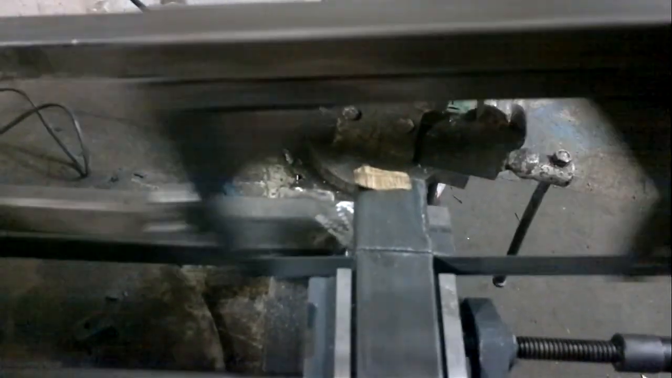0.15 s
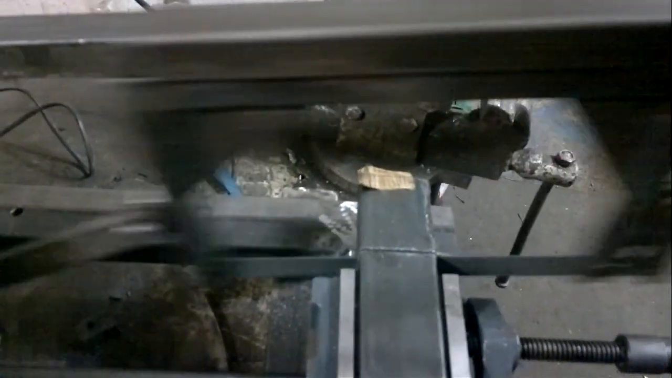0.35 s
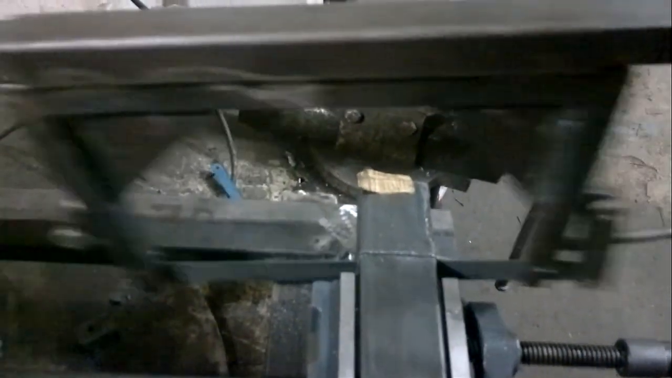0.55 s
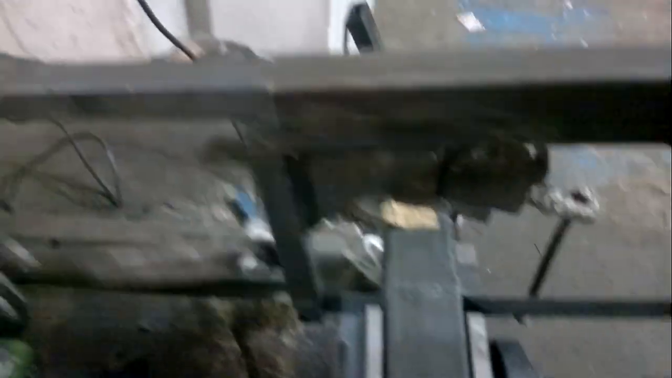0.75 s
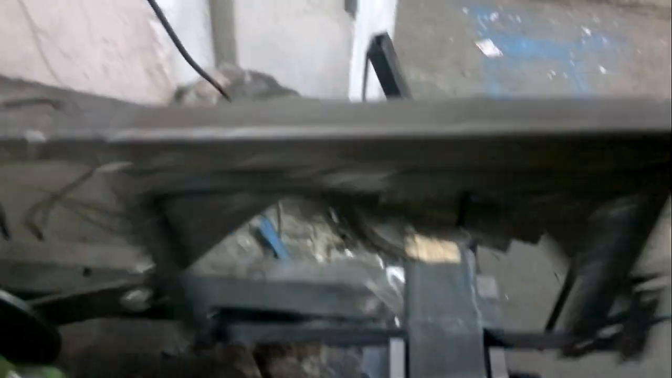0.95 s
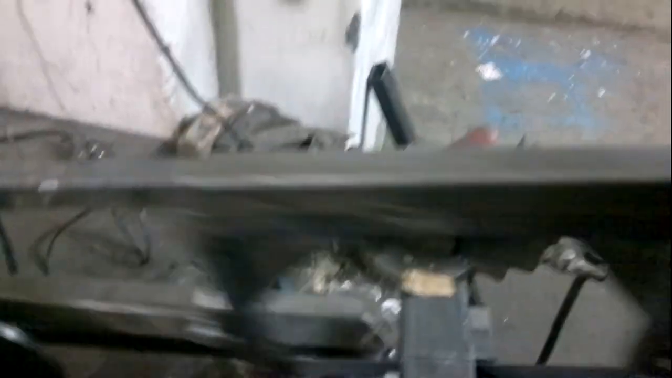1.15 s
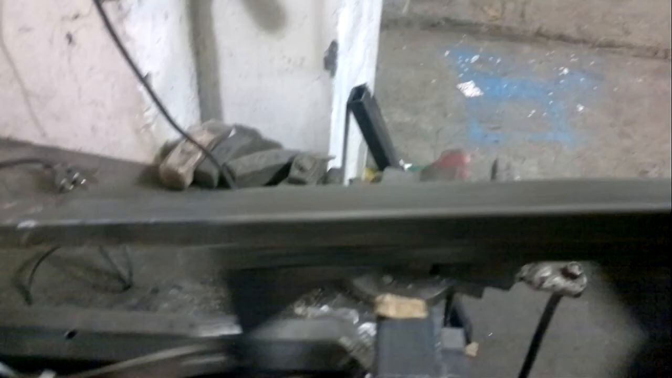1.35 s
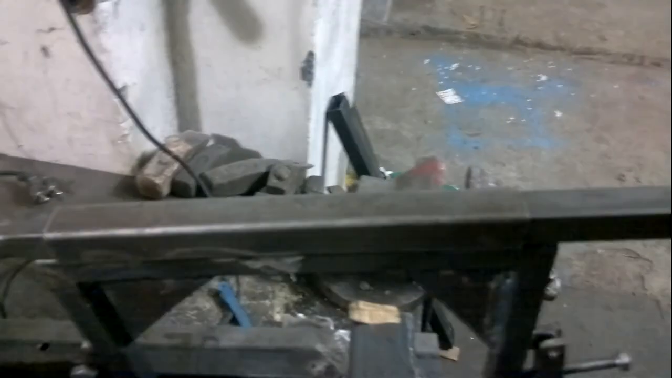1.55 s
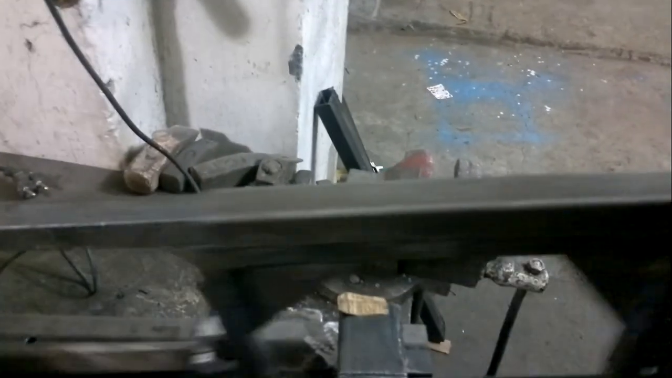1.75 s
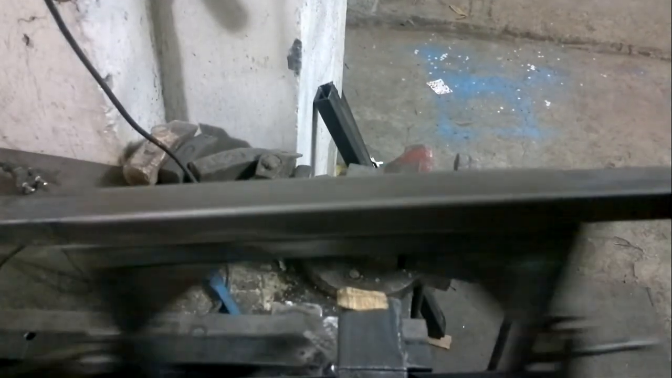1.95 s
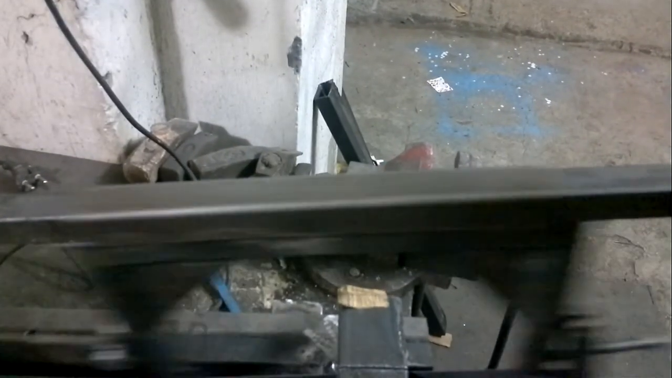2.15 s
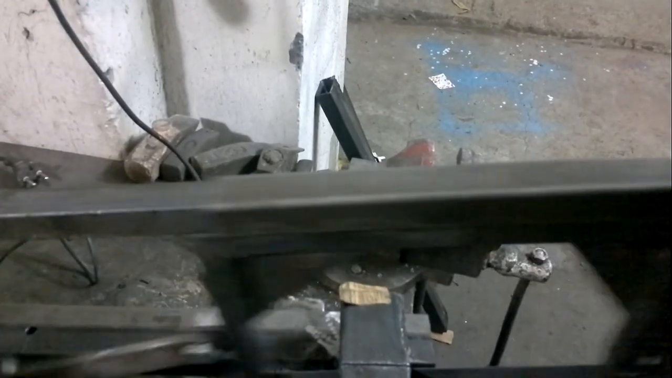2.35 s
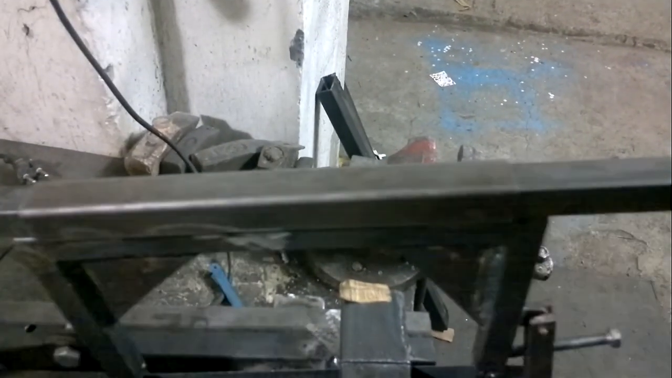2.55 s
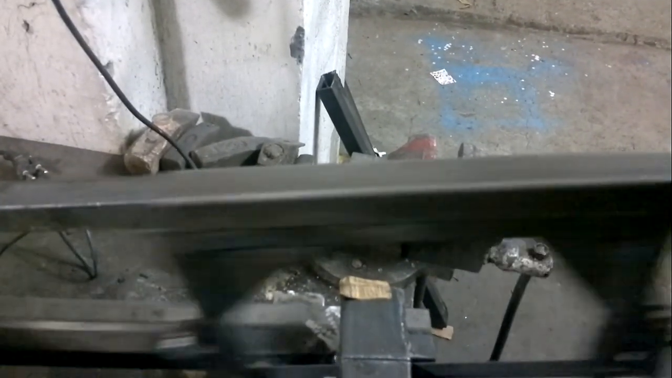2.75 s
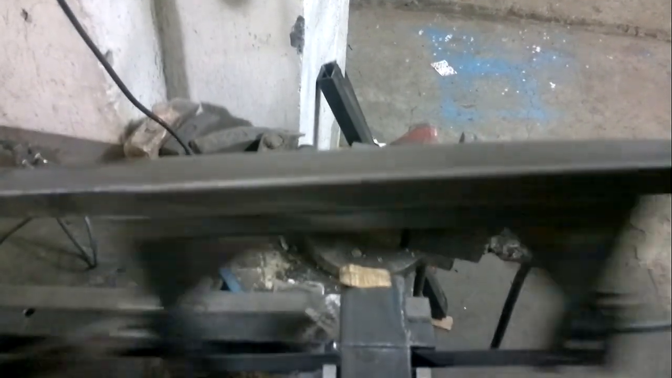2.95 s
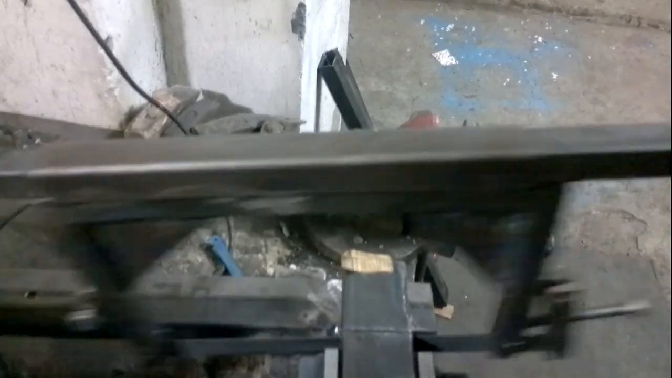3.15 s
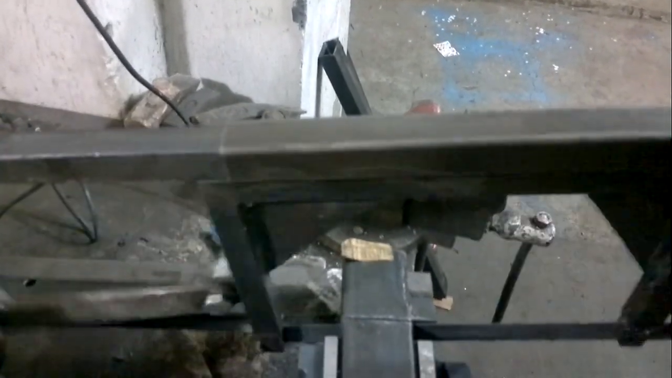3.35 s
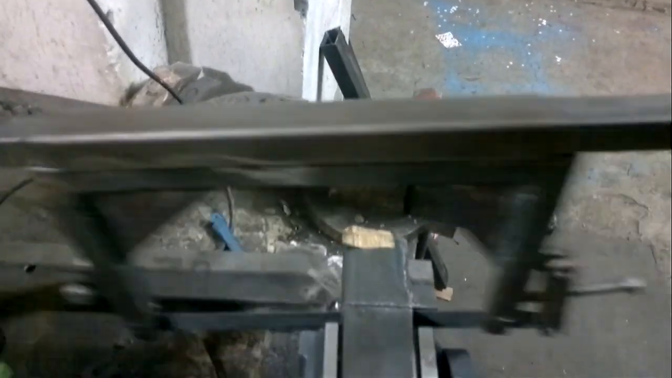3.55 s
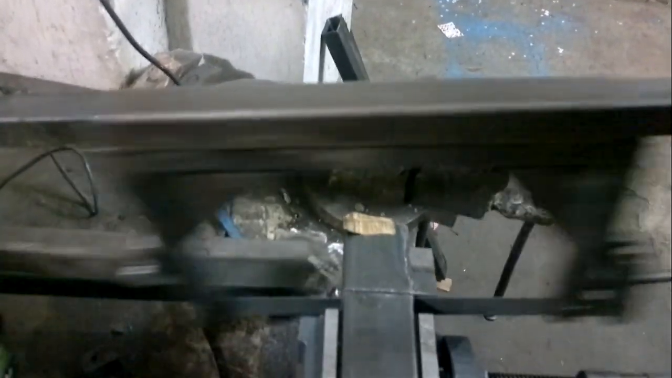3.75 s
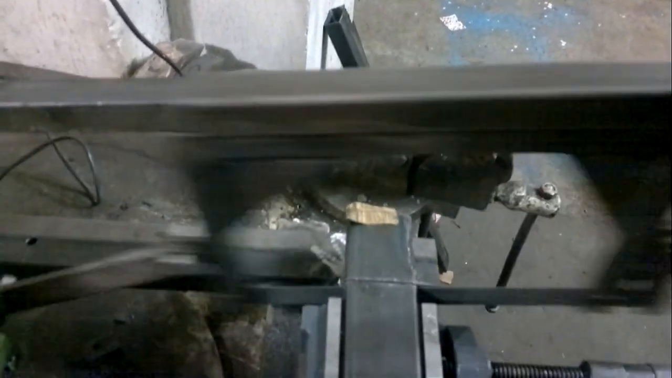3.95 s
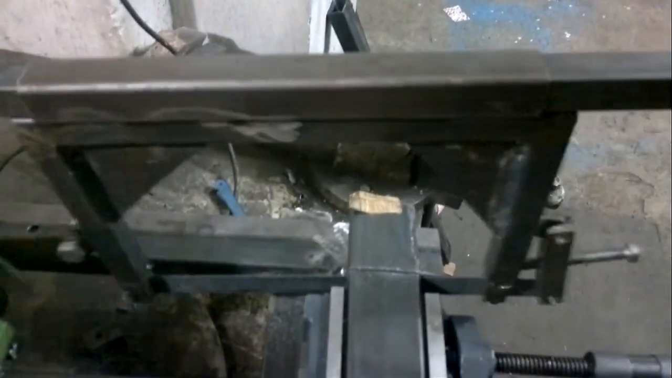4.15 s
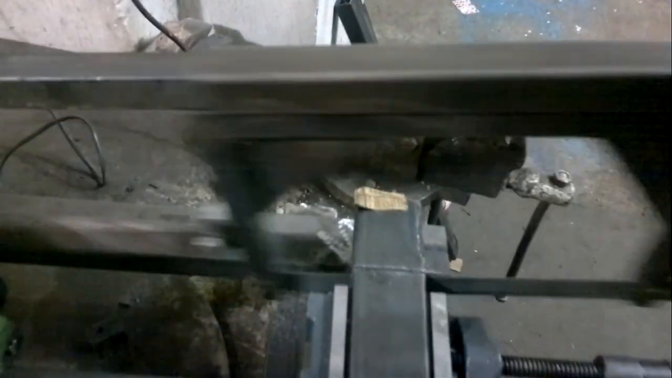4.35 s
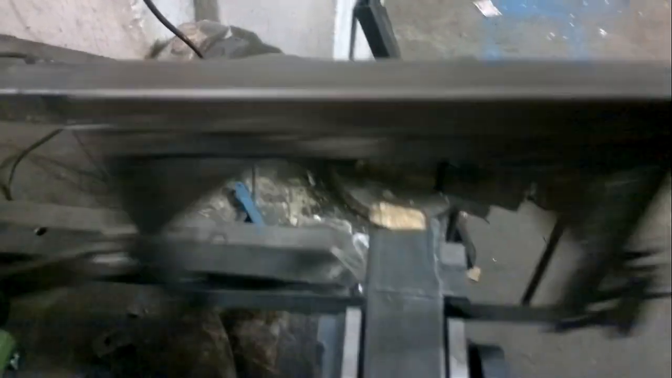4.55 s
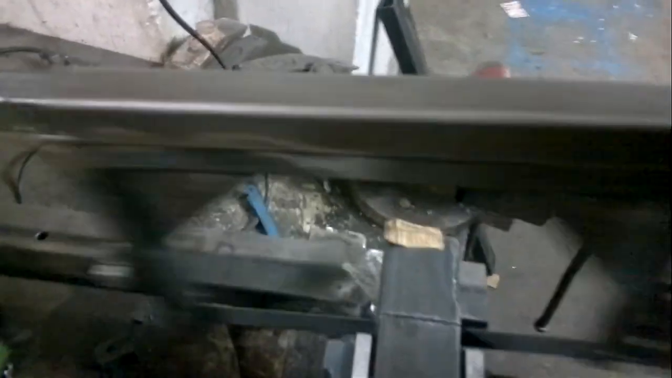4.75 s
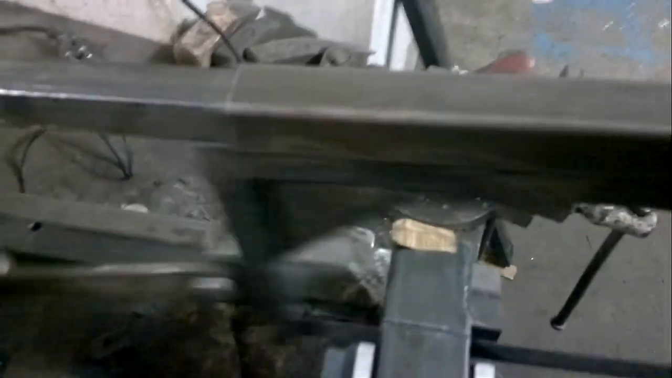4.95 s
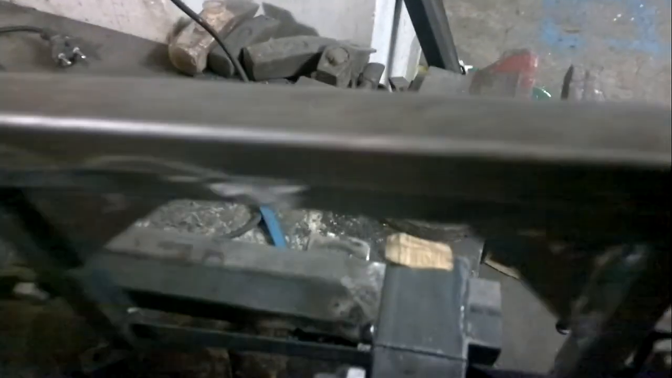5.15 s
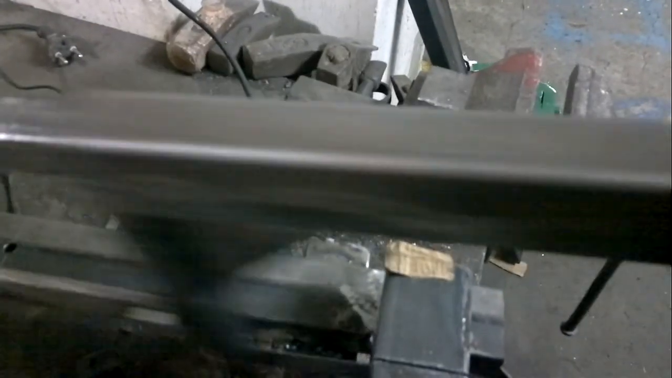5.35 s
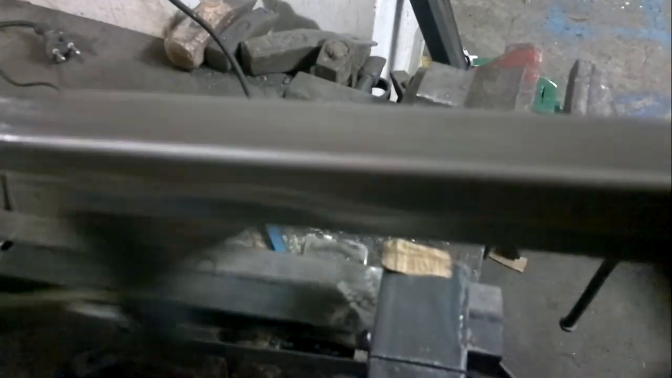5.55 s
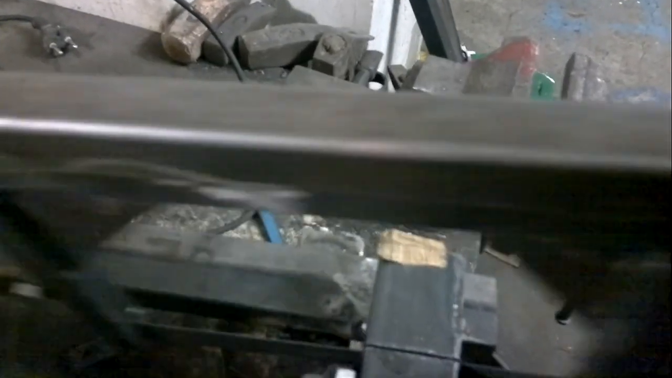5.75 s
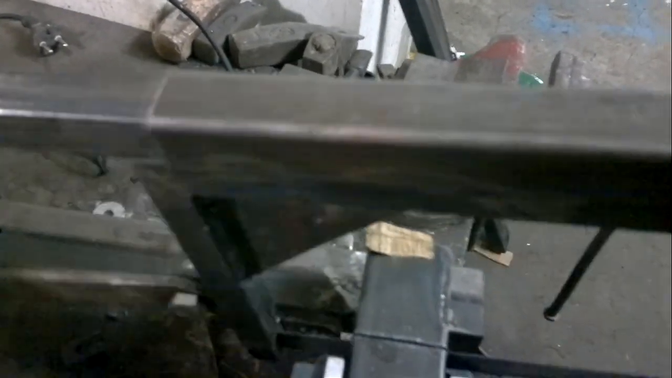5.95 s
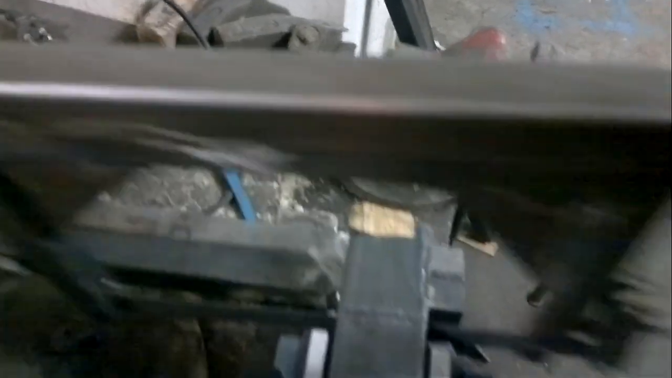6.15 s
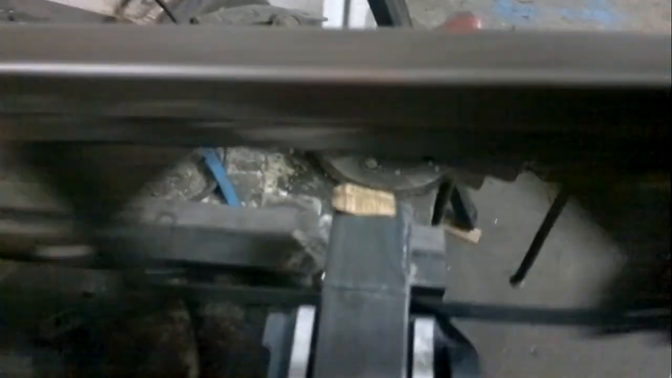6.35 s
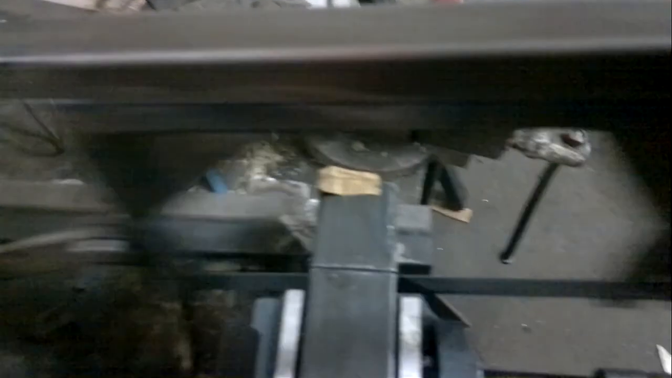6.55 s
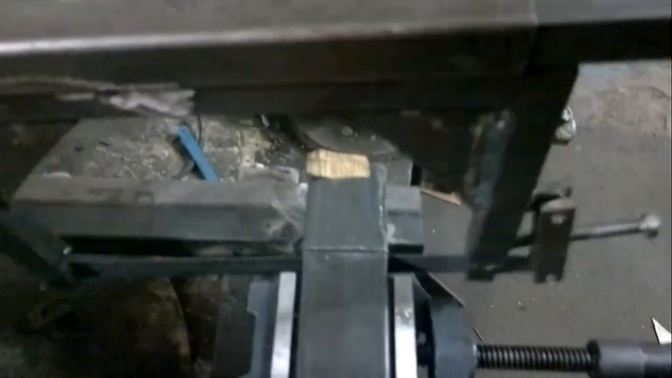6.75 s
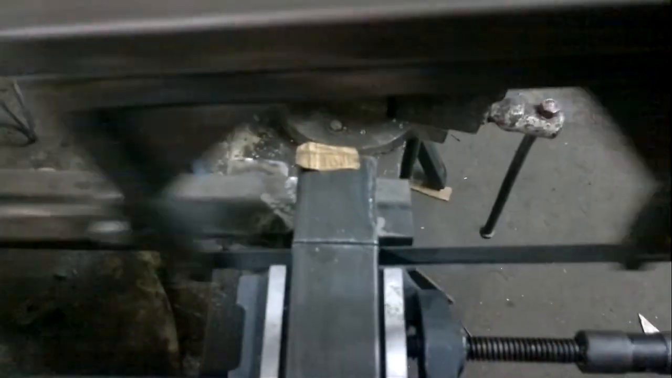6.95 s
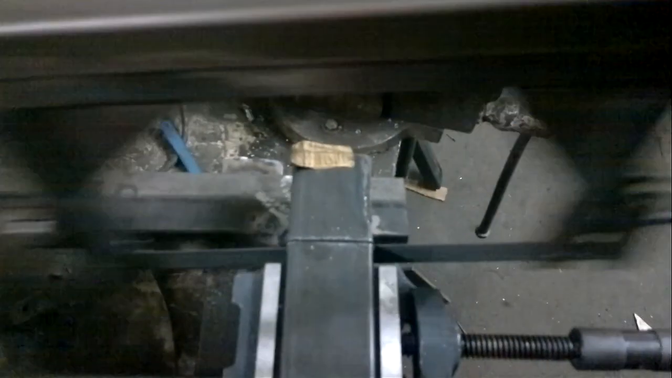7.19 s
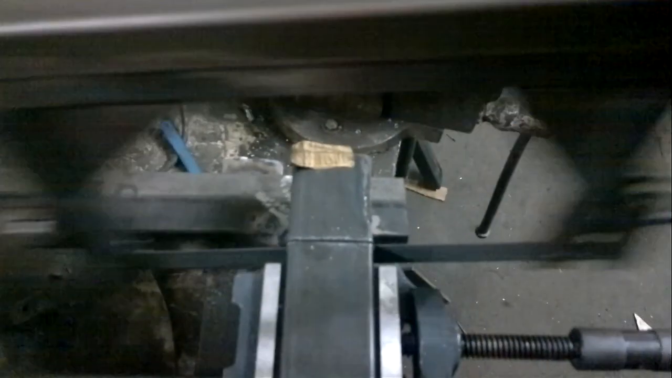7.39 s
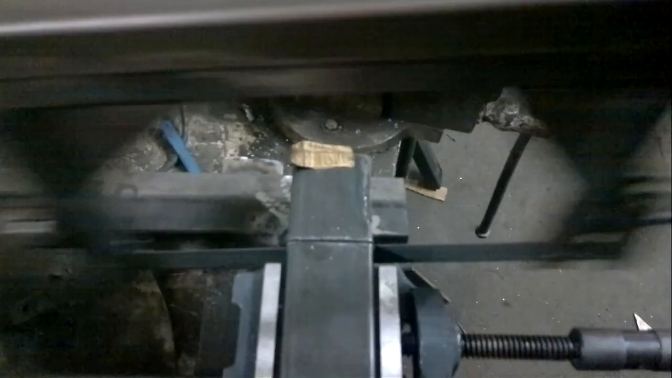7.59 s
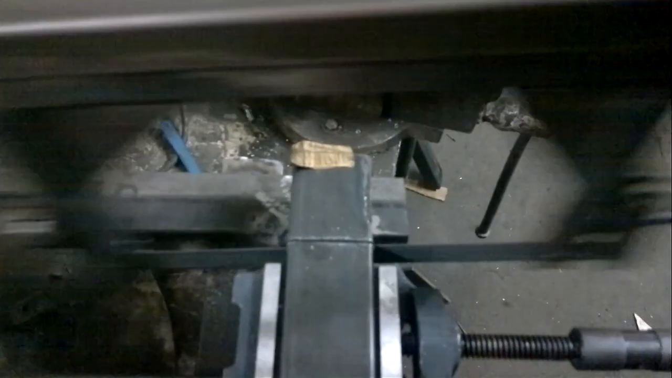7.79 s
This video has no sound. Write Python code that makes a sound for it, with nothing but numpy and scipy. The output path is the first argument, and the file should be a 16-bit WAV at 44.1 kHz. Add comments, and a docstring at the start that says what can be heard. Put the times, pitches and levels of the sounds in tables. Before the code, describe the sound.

Close in a small workshop, a motor-driven saw cuts metal with quick, even rasping strokes, sharp knocks and a steady hum and rumble.

```python
"""A homemade power hacksaw works through a square steel tube, close by in a small workshop.
A motor hums and the stand rumbles throughout, as a crank drives the blade to and fro about twice a second.
First the linkage knocks and the blade drags back, the slide groaning, a tooth sometimes snagging.
After another knock the teeth bite, chatter and rasp, the blade rings, the stand thuds and the stroke
glides out. Fourteen such cycles run, then the sound stops dead."""
import sys
import numpy as np
from scipy import signal
from scipy.fft import rfft, irfft
from scipy.io import wavfile
from scipy.ndimage import uniform_filter1d

SR = 44100
rng = np.random.default_rng(int(sys.argv[2]) if len(sys.argv) > 2 else 0)


def pcm_store(signal):
    """Save signal as 16-bit PCM."""
    levels = np.round(np.clip(np.atleast_2d(signal), -1, 1) * 32767)
    wavfile.write(sys.argv[1], SR, levels.astype(np.int16).T)


N = 344808
TIME = np.arange(N) / SR
TAPS = 16384


def undb(db):
    """Decibels to gain."""
    return 10 ** (np.asarray(db) / 20)


def unit(x):
    """Scale to rms 1."""
    return x / np.sqrt(np.mean(x ** 2))


def wobble(rate_hz):
    """Random steps, smoothed twice; rms 1."""
    hold = max(int(SR / rate_hz), 1)
    steps = np.repeat(rng.standard_normal(N // hold + 1), hold)
    return unit(uniform_filter1d(uniform_filter1d(steps, hold), hold)[:N])


def through(x, response):
    """Convolve each channel with an impulse response."""
    x = np.atleast_2d(x)
    return signal.fftconvolve(x, np.atleast_2d(response), axes=1)[:, :x.shape[1]]


def colour(spectrum, modes=()):
    """Minimum-phase response: a (freq_hz, level_db) spectrum plus (pitch_hz, t60_s, level_db) modes."""
    freq_hz, level_db = np.transpose(spectrum)
    bins_hz = np.maximum(np.arange(TAPS // 2 + 1) * SR / TAPS, 1)
    power = unit(undb(np.interp(np.log(bins_hz), np.log(freq_hz), level_db))) ** 2
    for pitch_hz, t60_s, mode_db in modes:
        detune = (bins_hz - pitch_hz) * 2 * np.pi * t60_s / np.log(1000)
        peak = unit(1 / np.hypot(1, detune) / np.hypot(1, detune / 10))
        power = power + (undb(mode_db) * peak) ** 2
    cepstrum = irfft(np.log(power) / 2)
    cepstrum[1:TAPS // 2] *= 2
    cepstrum[TAPS // 2 + 1:] = 0
    return irfft(np.exp(rfft(cepstrum)))


def stereo_noise(envelope=1, alike_hz=1050):
    """Noise pair: long waves reach both sides alike, short ones unrelated."""
    left, other = rfft(envelope * rng.standard_normal((2, N)))
    freq_hz = np.arange(len(left)) * SR / N
    alike = 1 / (1 + (freq_hz / alike_hz) ** 4)
    right = alike * left + np.sqrt(1 - alike ** 2) * other
    return irfft(np.array([left, right]), N)


def resonant_noise(modes):
    """Noise in steep (pitch_hz, width_hz, level_db) resonances; rms 1."""
    total = 0
    for pitch_hz, width_hz, level_db in modes:
        b, a = signal.iirpeak(pitch_hz, pitch_hz / (2 * width_hz), fs=SR)
        band = signal.lfilter(b, a, rng.standard_normal(N))
        total = total + undb(level_db) * unit(signal.lfilter(b, a, band))
    return unit(total)


def swell(start_s, level_db, rise_db, attack_s, hold_s, release_s, change_db=0):
    """Envelope: climbs rise_db to level_db, moves change_db over the hold, falls 20 dB per release_s."""
    gain = np.zeros(N)
    span = slice(*np.searchsorted(TIME, [start_s, start_s + attack_s + hold_s + 3 * release_s]))
    held_s = TIME[span] - start_s - attack_s
    attack_db = rise_db * np.minimum(held_s / attack_s, 0)
    hold_db = change_db * np.clip(held_s / hold_s, 0, 1)
    release_db = 20 * np.maximum(held_s - hold_s, 0) / release_s
    gain[span] = undb(level_db + attack_db + hold_db - release_db)
    return gain


def bursts(times_s, sizes, fall_s):
    """Envelope: jumps at each blow, decays exponentially."""
    blows = np.zeros(N)
    np.add.at(blows, np.clip((np.asarray(times_s) * SR).astype(int), 0, N - 1), sizes)
    return signal.lfilter([1], [1, -np.exp(-1 / (fall_s * SR))], blows)


def linger(power, t60_s):
    """Stored energy leaks away, 60 dB in t60_s."""
    keep = np.exp(-2 * np.log(1000) / (t60_s * SR))
    return signal.lfilter([1 - keep], [1, -keep], power)


def crank():
    """Crank angle in half turns: a whole number at each reversal of the blade."""
    reversals_s = np.sort([row[0] for row in CUTS + RETURNS])
    end_s = 2 * reversals_s[-1] - reversals_s[-2]
    return np.interp(TIME, np.append(reversals_s, end_s), np.arange(len(reversals_s) + 1))


def blade_speed():
    """0 at the reversals, 1 at mid-stroke."""
    return np.abs(np.sin(np.pi * crank()))


def teeth(grit_db, depth, mid_stroke_hz=480, grain_samples=6):
    """Tiny uneven fractures, bunched once per passing tooth; the rate follows blade speed."""
    rate_hz = mid_stroke_hz * blade_speed() * (1 + 0.1 * wobble(150))
    tooth_phase = np.cumsum(rate_hz) / SR % 1
    fractures = undb(grit_db * np.minimum(rng.exponential(size=N // grain_samples + 1), 5))
    return unit(np.repeat(fractures, grain_samples)[:N] * np.exp(-depth * tooth_phase))


# modes of tube and blade: pitch_hz, t60_s, catch_db, cut_db, rub_db
STEEL_MODES = [(615, 0.12, -24.5, -33.5, -32), (973, 0.017, -19, -20, -24.5), (2104, 0.031, -7, -2, -5.5),
               (2560, .09, -26.5, -33.5, -20), (3053, .06, -3, -9, -19.5), (3780, .026, -9.5, -17, -17.5),
               (4095, 0.02, -9, -23.5, -30), (5057, 0.06, -15, -14.5, -25), (6000, 0.024, -21, -24, -21.5),
               (10250, 0.011, -37, -22.5, -34.5)]


def radiate(force, spectrum, contact, frame_t60_s, room_db, modes_db=0, room_t60_s=0.35):
    """A force rings in the frame's dense modes, the steel's few strong ones and the workshop."""
    energy = linger(force ** 2, frame_t60_s) + undb(room_db) ** 2 * linger(force ** 2, room_t60_s)
    pitch_hz, t60_s, catch_db, cut_db, rub_db = np.transpose(STEEL_MODES)
    level_db = {"catch": catch_db, "cut": cut_db, "rub": rub_db}[contact] + modes_db
    return through(stereo_noise(np.sqrt(energy)), colour(spectrum, zip(pitch_hz, t60_s, level_db)))


# rumble as the microphones move about the machine: time_s, hum_db, frame_db
RUMBLE_LEVELS = [(0.0, -31, -40.5), (0.15, -34, -40.5), (1.05, -31, -35), (1.6, -38.0, -44),
                 (2.0, -34.5, -37), (2.6, -40, -41.5), (3.05, -30, -37.5), (3.6, -32.5, -38),
                 (4.15, -30.5, -33.5), (4.6, -36, -41.5), (5.3, -35.5, -38), (5.9, -39.5, -39.5),
                 (6.6, -39.0, -37.5), (7.25, -35.5, -40.5)]
# drive whirr: freq_hz, level_db
WHIRR_SPECTRUM = [(100, -12), (350, 2), (600, -5), (900, -3.5), (1400, -9.5), (2100, 0), (4000, -2.5),
                  (6000, -19.5), (15000, -41)]


def drive(hum_hz=120.5):
    """The motor hums at twice the mains rate and shakes stand and panels; whirr grows with blade speed."""
    time_s, hum_db, frame_db = np.transpose(RUMBLE_LEVELS)
    cycles = np.cumsum(hum_hz * (1 + 0.01993 * wobble(14))) / SR
    motor = unit(np.sin(2 * np.pi * cycles) + undb(-3.5) * resonant_noise([(134.5, 10.3, 0)]))
    hum = undb(np.interp(TIME, time_s, hum_db) + 2.4 * wobble(14)) * motor
    sway = undb(-0.5 + 2 * wobble(11)) * resonant_noise(STAND_MODES)
    rattle = undb(-1) * resonant_noise(PANEL_MODES)
    frame = undb(np.interp(TIME, time_s, frame_db)) * (sway + rattle)
    whirr = unit(through(stereo_noise(), colour(WHIRR_SPECTRUM)))
    whirr_db = -39.54 + 2.02 * blade_speed() + 1.8 * wobble(25)
    return hum + frame + undb(whirr_db) * whirr


# resonances of the stand and its panels: pitch_hz, width_hz, level_db
STAND_MODES = [(46, 7.6, -8), (60, 7.6, -0.5), (77.6, 8.4, 0), (101, 4.3, 0)]
PANEL_MODES = [(171, 11, 0), (208, 11, 0), (238, 18, -3), (280, 40, -3), (326, 10, -2), (365, 50, -6)]


def stand_jolts(delay_s=0.039):
    """Each bite rattles the panels and, a moment later, rocks the stand in its low modes."""
    start_s, *_, thud_db, rattle_db = np.transpose(CUTS)
    t = TIME[:TAPS]
    rocking = sum(undb(db) * np.exp(-np.pi * width_hz * t) * np.sin(2 * np.pi * hz * t)
                  for hz, width_hz, db in STAND_MODES)
    push = bursts(start_s + delay_s, undb(thud_db), fall_s=0.003)
    thuds = through(push, rocking)
    rattle = sum(swell(s, db, rise_db=10, attack_s=0.05, hold_s=0.043, release_s=0.25)
                 for s, db in zip(start_s, rattle_db))
    return thuds * push.max() / np.abs(thuds).max() + rattle * resonant_noise(PANEL_MODES)


def slide(groan_hz=773, squeak_hz=2150, squeak_s=0.99, late_s=0.088):
    """The bow's guide groans on one note as it moves, most late in the return; once it squeaks."""
    setting_off = sum(swell(s, db, rise_db=12, attack_s=0.021, hold_s=0.025, release_s=0.093)
                      for s, *_, db, _ in RETURNS)
    slowing = sum(swell(s + late_s, db, rise_db=17, attack_s=0.12, hold_s=0.004, release_s=0.061)
                  for s, *_, db in RETURNS)
    in_cut = sum(swell(s, -38, rise_db=19, attack_s=0.024, hold_s=0.18, release_s=0.073, change_db=-6)
                 for s, *_ in CUTS)
    squeak_gain = swell(squeak_s, -25.5, rise_db=20, attack_s=0.026, hold_s=0.026, release_s=0.043)
    squeak = squeak_gain * resonant_noise([(squeak_hz, 210, 0)])
    groan = (setting_off + slowing + in_cut) * resonant_noise([(groan_hz, 36, 0)])
    return groan + squeak


# linkage knock: freq_hz, level_db
KNOCK_SPECTRUM = [(200, -9), (1300, -6.5), (2200, -8), (3200, 5.5), (4400, 0), (5300, -12), (6500, -7),
                  (8500, -20), (13000, -28.5), (15500, -55)]


def linkage_knocks():
    """Slack in the linkage closes with a short bright knock at both ends of the travel."""
    return_s, knock_db, *_ = np.transpose(RETURNS)
    cut_s, *_ = np.transpose(CUTS)
    force = bursts(return_s, undb(knock_db), fall_s=0.0065) + bursts(cut_s, undb(-17.5), fall_s=0.0099)
    return radiate(force, KNOCK_SPECTRUM, "rub", frame_t60_s=0.039, room_db=-3.5, modes_db=-5)


# return strokes: start_s, knock_db, drag_db, early_groan_db, late_groan_db
RETURNS = [(0.051, -23, -20, -44.5, -30.5), (0.569, -19.5, -18.5, -45, -27),
           (1.092, -24, -18.5, -37.5, -31), (1.613, -29, -24, -49, -35), (2.131, -20, -19.5, -37.5, -35.5),
           (2.651, -22.5, -21, -40.5, -35.5), (3.172, -17.5, -19, -35.5, -33),
           (3.692, -17.5, -19, -32, -37), (4.212, -16, -16.5, -33, -33.5), (4.731, -20, -18, -45, -32),
           (5.252, -20, -20.5, -42, -34.5), (5.772, -21.5, -19.5, -46, -32.5),
           (6.293, -21, -20, -45, -32.5), (6.813, -21, -20.5, -42, -31)]
# blade dragging back: freq_hz, level_db
DRAG_SPECTRUM = [(200, -13.5), (550, -15), (1000, -11.5), (1400, -11), (2000, 2), (2500, 0), (4100, 2),
                 (5000, -10), (6400, -10), (8000, -17), (10500, -21.5), (13500, -31.5), (15500, -36.5)]


def blade_drag(speed_power=0.63):
    """The backs of the teeth swish over the tube, pressed hardest late in the return."""
    pressure = sum(swell(s, db, rise_db=10.5, attack_s=0.16, hold_s=0.026, release_s=0.15)
                   for s, _, db, *_ in RETURNS)
    load = pressure * blade_speed() ** speed_power
    force = load * undb(1.5 * wobble(110)) * teeth(grit_db=3.3, depth=1.6)
    return radiate(force, DRAG_SPECTRUM, "rub", frame_t60_s=0.025, room_db=-11, modes_db=-2)


# snagging teeth: start_s, level_db
SNAGS = [(0.703, -18), (1.78, -12.5), (2.787, -18.5), (2.821, -14.5), (2.855, -20), (3.847, -16),
         (5.417, -15.5), (6.488, -18), (6.951, -10)]


def tooth_snags():
    """A tooth hooks the edge of the cut on the way back and lets go with a ringing tick."""
    start_s, level_db = np.transpose(SNAGS)
    force = bursts(start_s, undb(level_db), fall_s=0.004)
    return radiate(force, DRAG_SPECTRUM, "catch", frame_t60_s=0.012, room_db=-8, modes_db=3)


# blade gliding out: freq_hz, level_db
GLIDE_SPECTRUM = [(150, -12.5), (300, -4.5), (550, -13), (1300, -10), (2050, -5), (2800, -4), (4000, -4),
                  (5000, -17), (6500, -16), (10000, -26.5), (13500, -35), (15500, -48)]


def blade_glide(speed_power=1.81):
    """The blade rubs through the forward stroke, ever more softly as it slows."""
    start_s, *_, glide_db, _, _ = np.transpose(CUTS)
    stroke = crank().astype(int)
    forward_strokes = np.rint(np.interp(start_s, TIME, crank())).astype(int)
    pressure = np.zeros(stroke[-1] + 1)
    pressure[forward_strokes] = undb(glide_db)
    load = pressure[stroke] * blade_speed() ** speed_power
    force = load * undb(0.45 * wobble(70)) * teeth(grit_db=3, depth=1)
    return radiate(force, GLIDE_SPECTRUM, "rub", frame_t60_s=0.032, room_db=-10.5, modes_db=1)


def blade_ring(pitch_hz=3780, width_hz=55):
    """Each bite sets one mode of the taut blade singing, faintly in the last strokes as the cut deepens."""
    gain = sum(swell(s, db, rise_db=16.5, attack_s=0.0074, hold_s=0.036, release_s=0.055)
               for s, _, _, _, db, *_ in CUTS)
    return gain * np.array([resonant_noise([(pitch_hz, width_hz, 0)]) for _ in range(2)])


def bow_chatter(rate_hz=108, catches=11):
    """Envelope of the bow's catches in each cut: regular at first, then looser and weaker."""
    start_s = np.array(CUTS)[:, :1]
    scatter = rng.standard_normal((len(CUTS), 2, catches))
    gaps_s = np.abs(1 + scatter[:, 0] * np.linspace(0.02, 0.36, catches)) / rate_hz
    catch_s = start_s + np.cumsum(gaps_s, axis=1) - gaps_s
    sizes = undb(scatter[:, 1]) * np.linspace(2.4, 0.7, catches)
    return bursts(catch_s.ravel(), sizes.ravel(), fall_s=0.0027)


# cutting strokes: start_s, bite_db, surge_db, length_s, ring_db, glide_db, thud_db, rattle_db
CUTS = [(0.312, -14.5, -14.5, 0.081, -15.5, -25.5, -23.5, -28.5),
        (0.832, -14.5, -17, 0.089, -20, -25, -25, -30.5), (1.352, -15, -14, .075, -22, -35.5, -21.5, -41),
        (1.872, -15.5, -16.5, 0.092, -19.5, -28, -26, -45),
        (2.391, -16, -18.5, .103, -14.5, -30, -28, -39.5), (2.912, -15.5, -23, 0.089, -22, -27, -30, -44.5),
        (3.432, -15, -15, 0.083, -18, -25, -23, -28), (3.952, -16, -18.5, 0.067, -21, -23, -22.5, -31),
        (4.473, -16, -12.5, 0.078, -14, -28, -19, -35), (4.993, -15, -13, 0.085, -16, -30, -31, -34),
        (5.513, -14.5, -14, 0.087, -25, -31, -35, -33.5), (6.033, -14, -12.5, 0.091, -40, -30, -33, -35.5),
        (6.552, -16, -14, .093, -44, -29, -25, -34.5), (7.074, -14.5, -14, 0.095, -44, -30, -26, -36.5)]
# teeth cutting: freq_hz, level_db
CUT_SPECTRUM = [(100, -15), (250, -8), (550, -10.5), (900, -9.5), (1500, -5.5), (2050, -1.5), (2600, 2),
                (3800, 2), (4600, -6), (6500, -9.5), (8500, -18.5), (10500, -21.5), (13500, -29),
                (15500, -44)]


def cutting(surge_delay_s=0.041, surge_attack_s=0.017):
    """The teeth bite, ease and surge again; that load drives both chatter and rasp."""
    bite = surge = scrape = 0
    for start_s, bite_db, surge_db, length_s, *_ in CUTS:
        bite += swell(start_s, bite_db, rise_db=5.5, attack_s=0.009, hold_s=0.029, release_s=0.033)
        surge += swell(start_s + surge_delay_s, surge_db, rise_db=7.5, attack_s=surge_attack_s,
                       hold_s=length_s - surge_delay_s - surge_attack_s, release_s=0.048)
        scrape += swell(start_s, -5.5, rise_db=6, attack_s=0.019, hold_s=0.18, release_s=0.05, change_db=6)
    load = np.hypot(bite, surge)
    chatter = radiate(load * bow_chatter(), CUT_SPECTRUM, "catch", frame_t60_s=0.021, room_db=-15.5)
    rasp_force = load * scrape * teeth(grit_db=4, depth=0.5)
    return chatter + radiate(rasp_force, CUT_SPECTRUM, "cut", frame_t60_s=0.0081, room_db=-11)


def scene():
    """The whole machine, in stereo."""
    forward = cutting() + blade_ring() + blade_glide()
    return forward + linkage_knocks() + blade_drag() + tooth_snags() + slide() + drive() + stand_jolts()


# balance across the spectrum: freq_hz, left_minus_right_db
BALANCE = [(60, -10.5), (110, -9.5), (200, -12.5), (380, -8.5), (700, -9), (1290, -2.5), (2380, -13.5),
           (4400, -7.5), (8120, -7.5), (15000, 0.5)]
# balance as the microphones wander, applied about its mean: time_s, left_minus_right_db
BALANCE_DRIFT = [(0.0, -9.5), (0.86, -8.5), (1.2, -9.5), (1.96, -11.0), (2.4, -9.5), (2.78, -10),
                 (3.81, -9), (5.05, -9), (5.499, -9), (6.09, -9.5), (7.2, -8.5)]


def record(dry, left_lag_s=0.00007, low_hz=33, top_hz=15300, stop_s=7.292):
    """The left microphone hears less, and later; bass and top are cut, peaks clip, the sound stops dead."""
    bins_hz = np.arange(N // 2 + 1) * SR / N
    freq_hz, balance_db = np.transpose(BALANCE)
    tilt = undb(np.interp(bins_hz, freq_hz, balance_db))
    lag = np.exp(-2j * np.pi * bins_hz * left_lag_s)
    response = np.array([tilt * lag, np.ones_like(tilt)]) * np.sqrt(2 / (1 + tilt ** 2))
    heard = irfft(rfft(dry) * response, N)
    time_s, drift_db = np.transpose(BALANCE_DRIFT)
    pan_db = np.interp(TIME, time_s, drift_db - drift_db.mean())
    heard = heard * undb([0.85 * pan_db, -0.15 * pan_db])
    heard = signal.sosfilt(signal.butter(4, low_hz, "high", fs=SR, output="sos"), heard)
    heard = np.clip(heard, -1, 1) * (TIME < stop_s)
    return signal.sosfilt(signal.ellip(10, 0.2, 80, top_hz, fs=SR, output="sos"), heard)


dry = scene()
out = record(dry)
pcm_store(out)
```